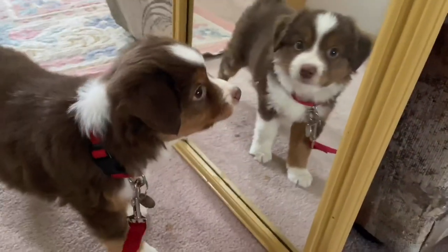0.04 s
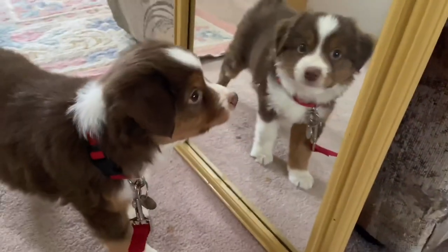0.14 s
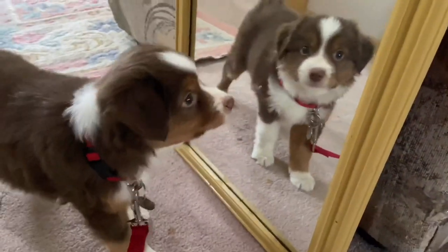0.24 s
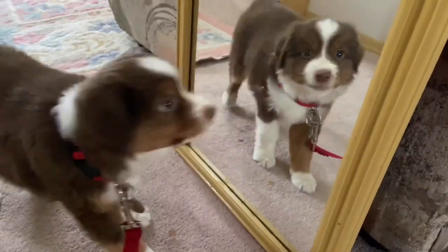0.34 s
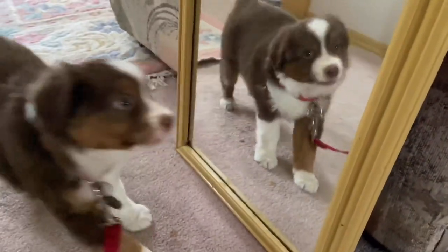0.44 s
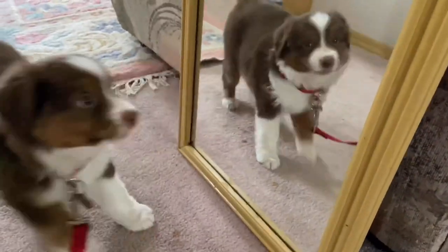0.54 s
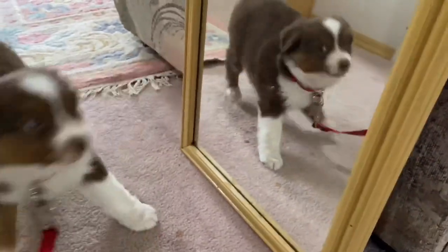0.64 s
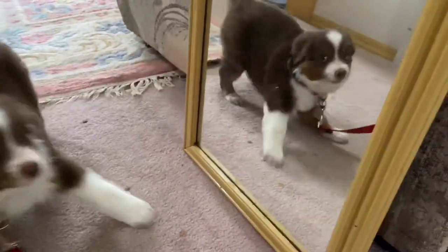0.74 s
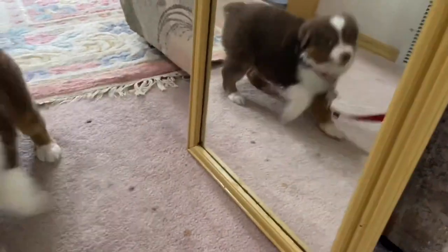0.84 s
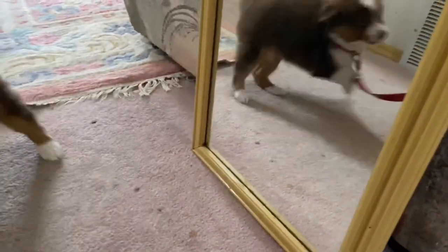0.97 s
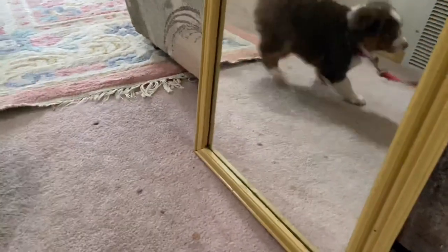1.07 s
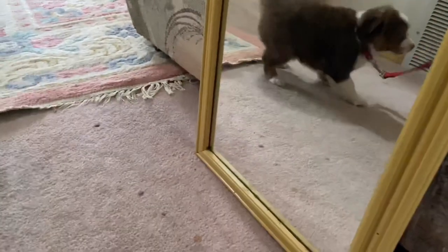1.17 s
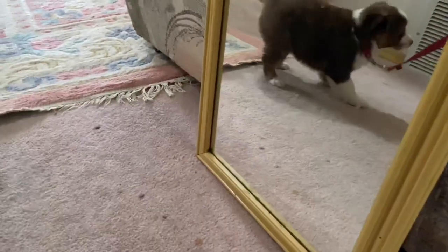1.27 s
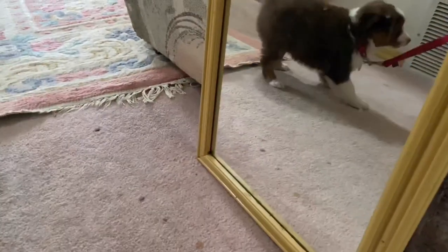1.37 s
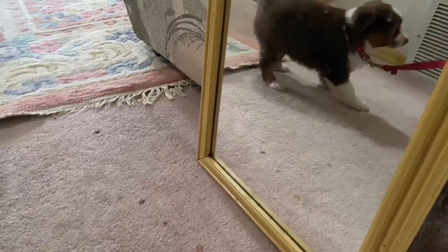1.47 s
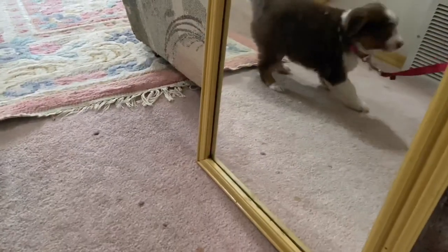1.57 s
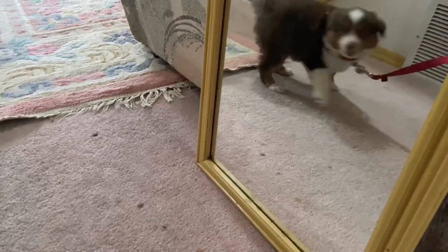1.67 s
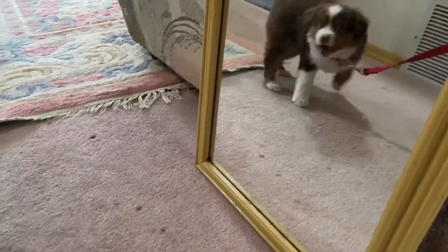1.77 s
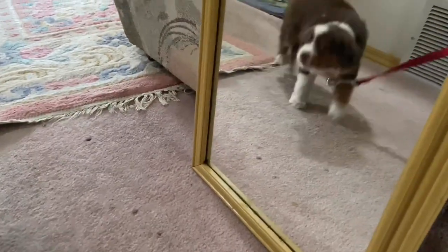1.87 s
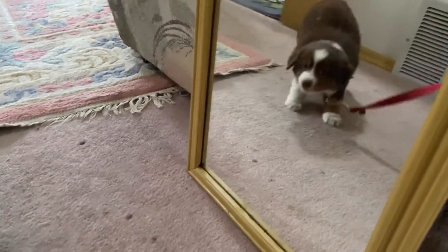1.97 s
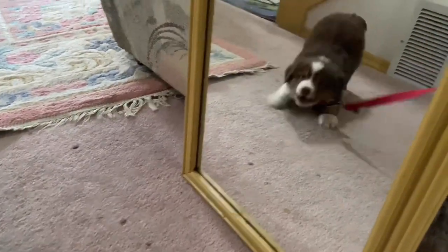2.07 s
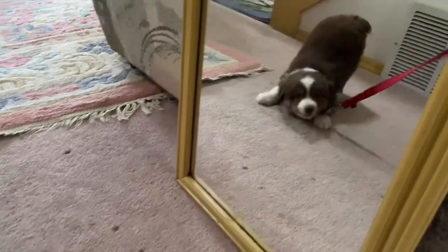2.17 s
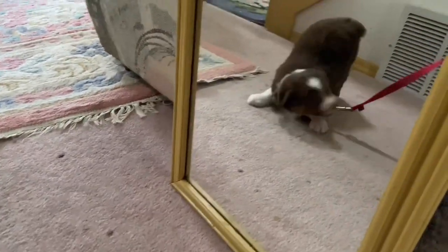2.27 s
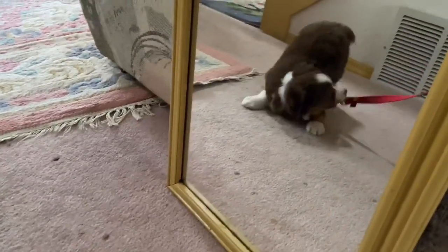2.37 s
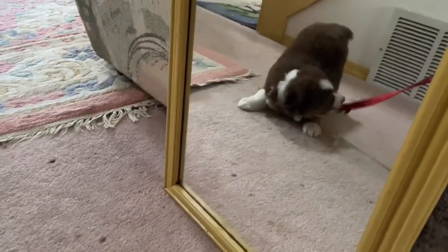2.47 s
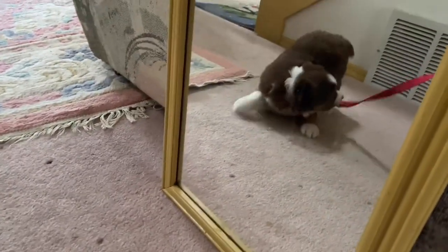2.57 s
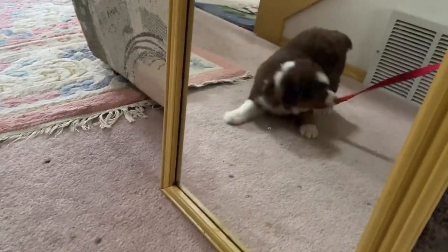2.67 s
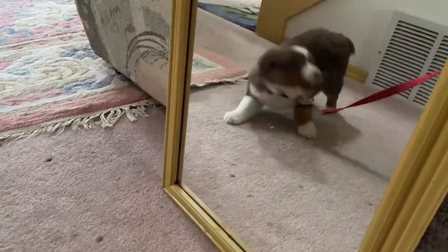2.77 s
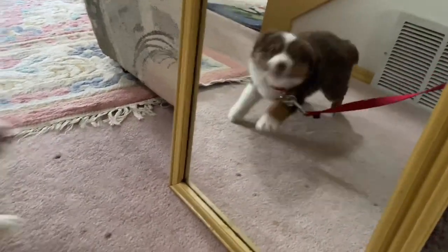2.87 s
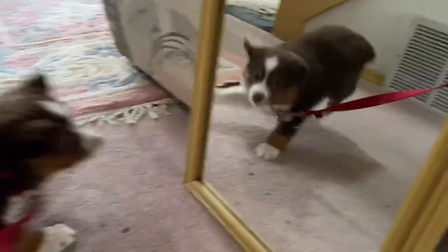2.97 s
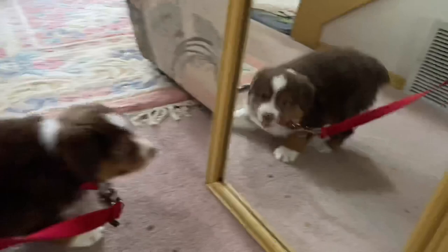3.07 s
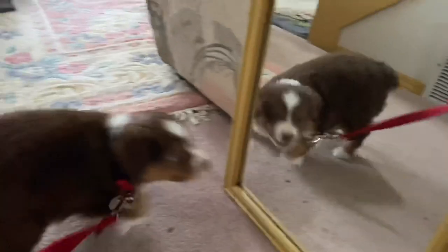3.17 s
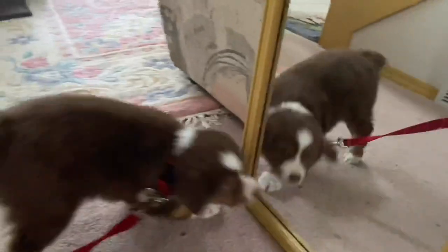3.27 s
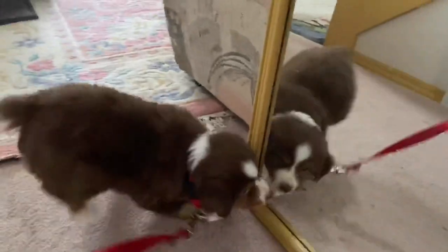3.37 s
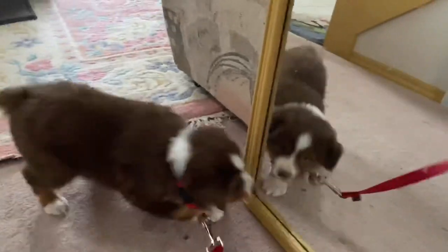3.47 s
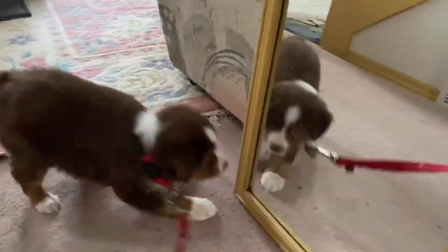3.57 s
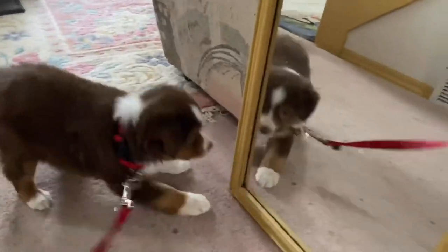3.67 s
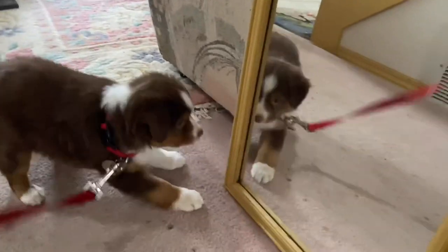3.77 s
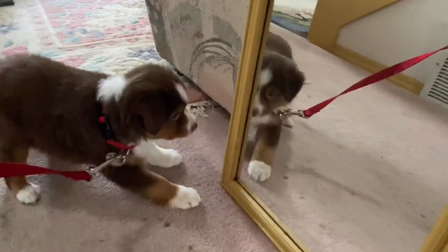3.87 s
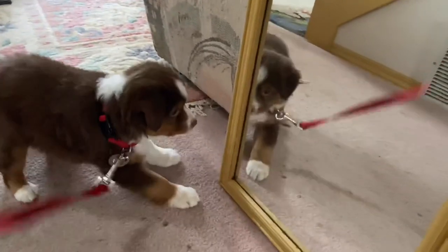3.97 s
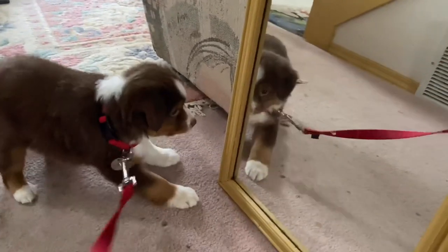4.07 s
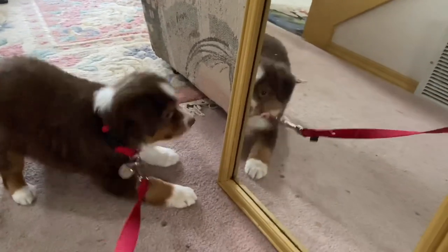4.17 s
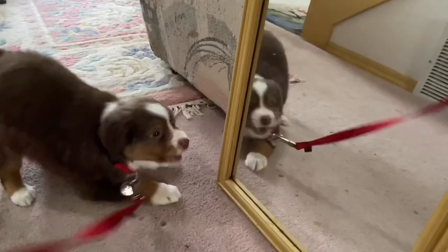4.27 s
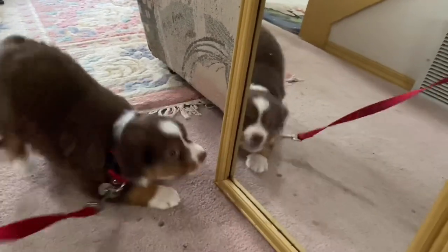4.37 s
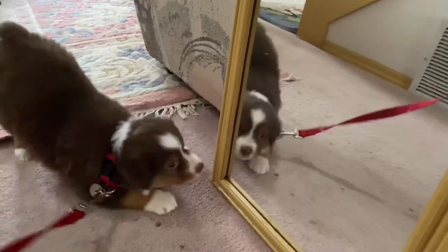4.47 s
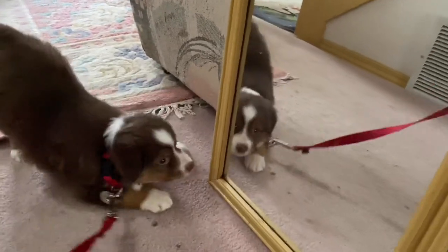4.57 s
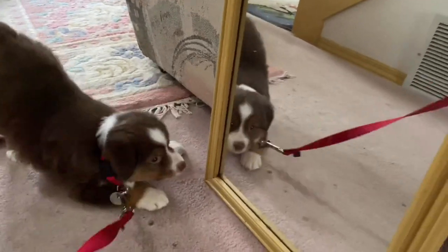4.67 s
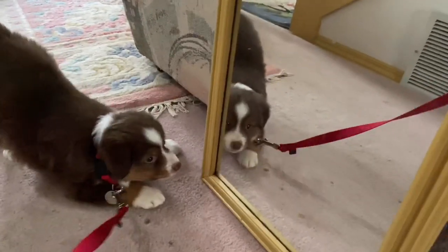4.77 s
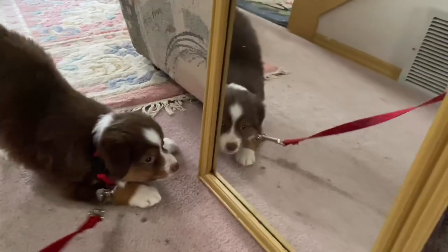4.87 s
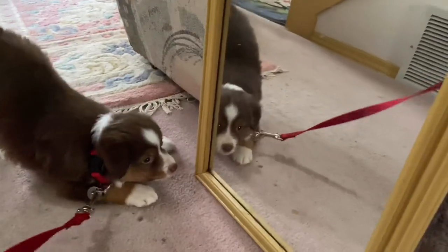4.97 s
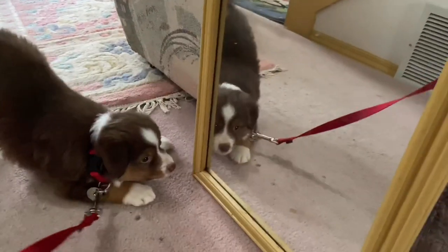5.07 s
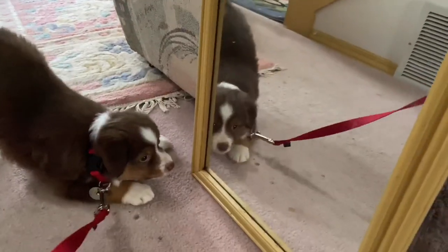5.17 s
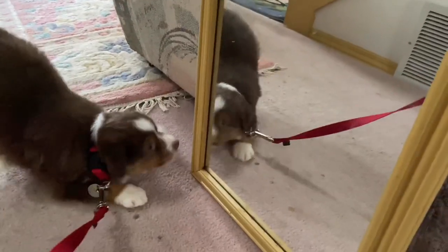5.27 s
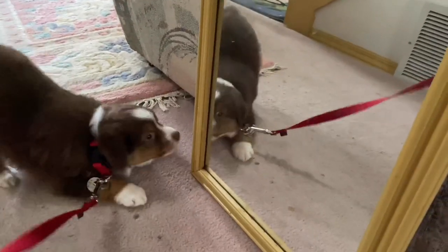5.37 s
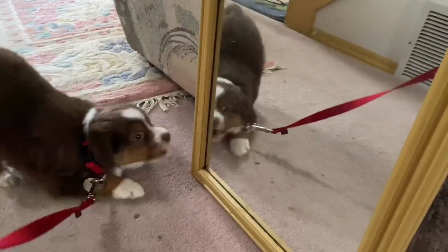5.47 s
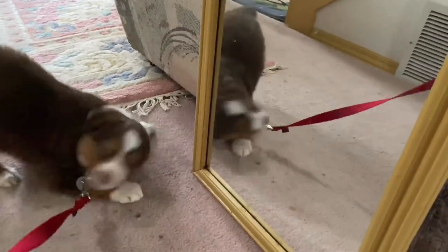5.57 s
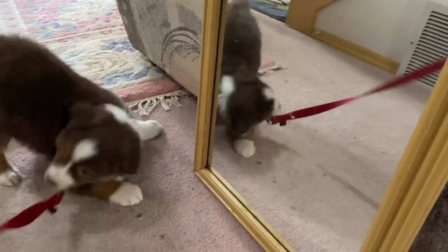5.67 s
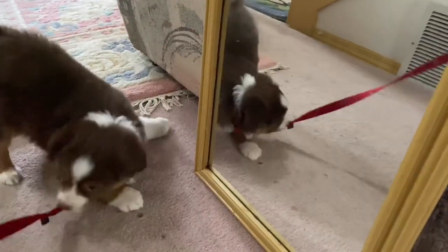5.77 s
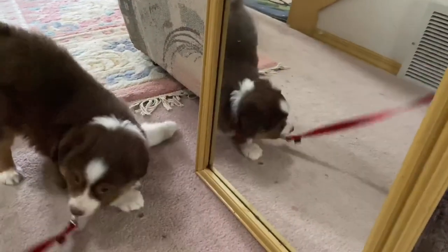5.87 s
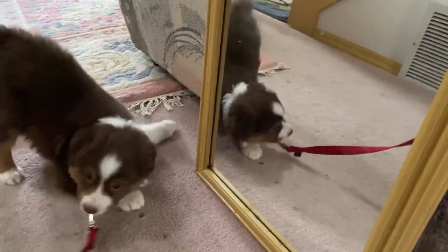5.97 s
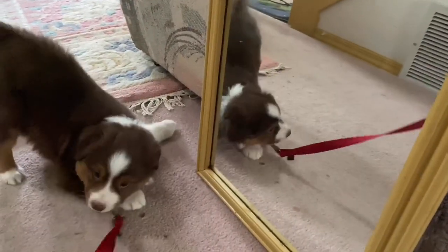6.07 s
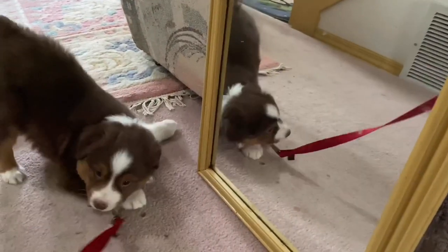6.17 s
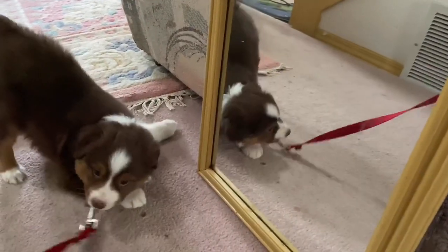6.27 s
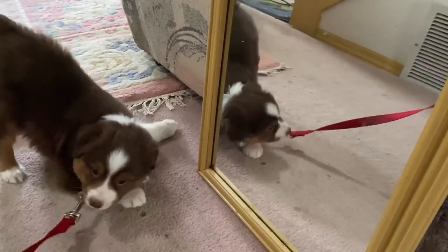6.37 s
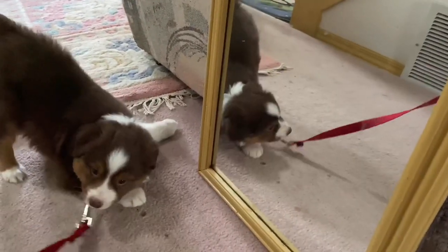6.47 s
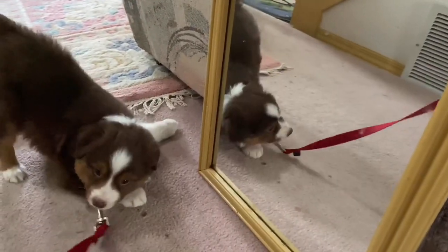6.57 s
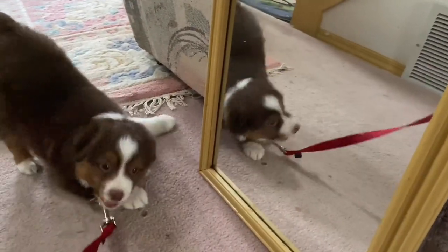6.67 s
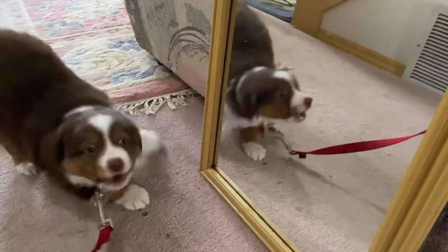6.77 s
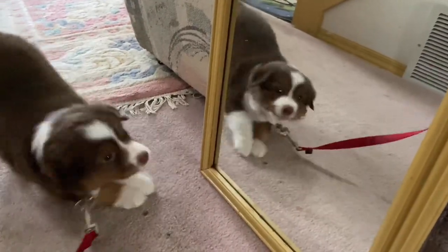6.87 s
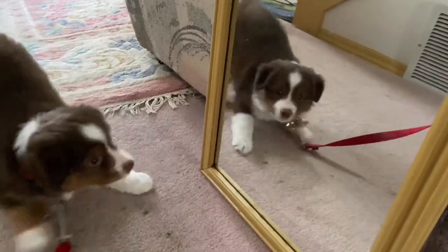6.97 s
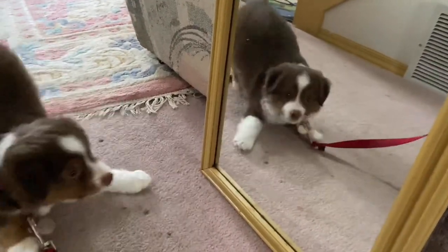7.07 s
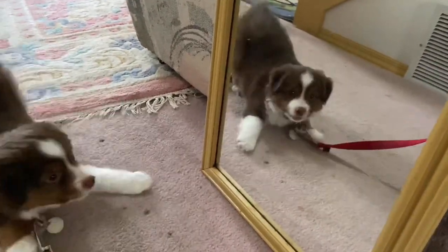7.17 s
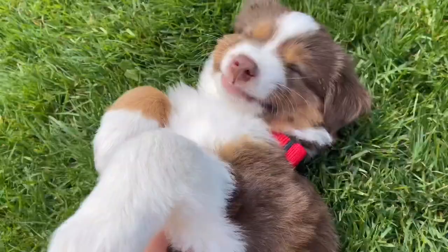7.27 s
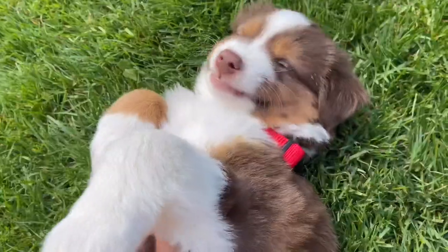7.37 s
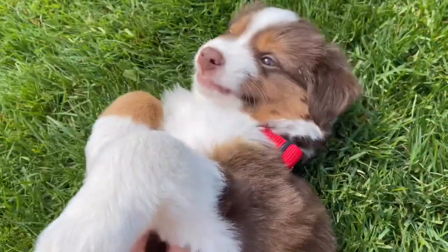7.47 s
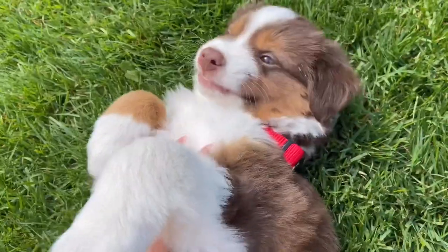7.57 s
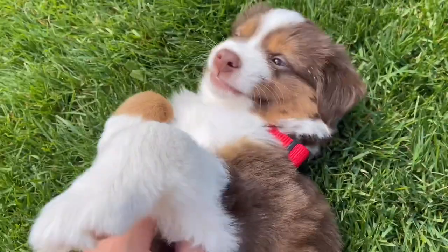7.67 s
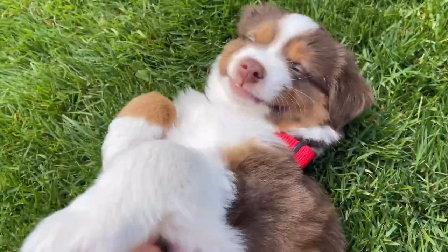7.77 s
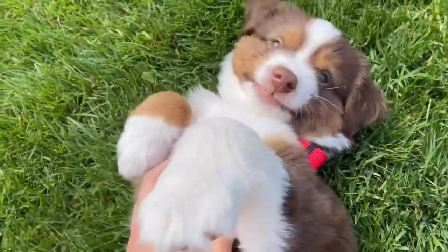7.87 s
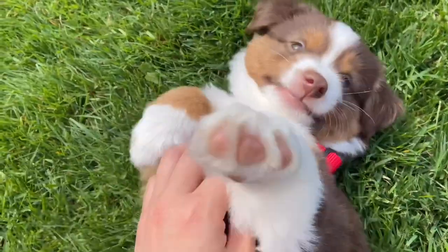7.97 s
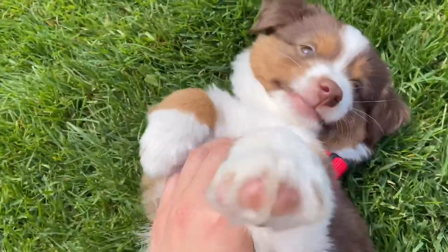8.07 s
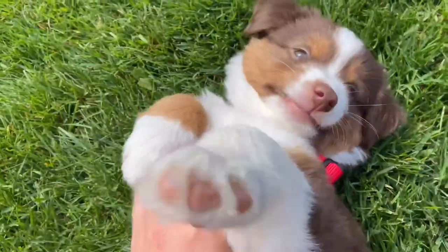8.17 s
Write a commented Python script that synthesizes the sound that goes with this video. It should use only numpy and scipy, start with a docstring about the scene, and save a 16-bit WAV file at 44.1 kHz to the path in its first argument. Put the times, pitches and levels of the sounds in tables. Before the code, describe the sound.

High-pitched puppy barks ring close by over a low room hum, with bright tag clinks and muffled paw thuds, before a brief quiet lawn ending.

```python
"""On a carpet indoors, close to a pair of microphones, a puppy barks in short arched yelps.
Its voice is a stack of harmonics shaped by throat and mouth, with rough air on top. Its collar tag clinks
on the leash clip as decaying tones plus clicks; after a short tick, paws scuff as grainy noise and thud as
damped low tones. The room hums as filtered noise and answers each bark with a decaying tail of echoes.
At the end the scene moves to a lawn: soft outdoor air, also filtered noise, and low puffs of wind."""
import sys
import numpy as np
from scipy import signal
from scipy.fft import rfft, irfft, next_fast_len
from scipy.io import wavfile
from scipy.ndimage import uniform_filter1d

SR = 44100
rng = np.random.default_rng(int(sys.argv[2]) if len(sys.argv) > 2 else 0)


def wav_record(signal):
    """Record a signal, one row per channel, as 16-bit PCM in the file named by sys.argv[1]."""
    frames = np.transpose(np.atleast_2d(signal))
    bounded = np.clip(frames, -1, 1)
    # unit amplitude maps onto the largest positive 16-bit level
    quanta = np.round(bounded * 32767).astype(np.int16)
    wavfile.write(sys.argv[1], SR, quanta)


N = 362274  # length in samples


def gain_of(db):
    """Turns decibels into a factor."""
    return 10 ** (np.asarray(db) / 20)


def evened(x):
    """Scales to an rms of 1."""
    return x / np.sqrt(np.mean(x ** 2) + 1e-20)


def smooth(x, *sizes):
    """Runs moving averages of the given lengths along the last axis, then scales to an rms of 1."""
    for size in sizes:
        x = uniform_filter1d(x, size=size)
    return evened(x)


def read(points, hz):
    """Reads a curve between its points on a log-frequency axis."""
    f, value = np.transpose(points)
    return np.interp(np.log(hz + 1), np.log(f + 1), value)


def follow(points, t):
    """Reads a curve of (seconds, value) points with straight lines between them."""
    return np.interp(t, *np.transpose(points))


def add(mix, s, sound):
    """Mixes a sound in at s seconds."""
    part = mix[..., round(s * SR):][..., :sound.shape[-1]]
    part += sound[..., :part.shape[-1]]


def coloured(x, points):
    """Filters x by a spectrum, then scales to an rms of 1."""
    size = x.shape[-1]
    gains = gain_of(read(points, np.fft.rfftfreq(size, 1 / SR)))
    return evened(irfft(rfft(x) * gains, size))


def bumps(rows, t60):
    """Low tones that start softly and lose 60 dB in t60 seconds."""
    out, t = np.zeros(N), np.arange(6000) / SR
    for s, db, hz in rows:
        onset = 1 - np.exp(-t / 0.0024)
        add(out, s, gain_of(db - 60 * t / t60) * onset * np.sin(2 * np.pi * hz * t))
    return out


def outside():
    """Share of outdoor air: 0 indoors, then a 45 ms fade to 1 on the lawn."""
    return np.clip((np.arange(N) / SR - 7.2) / 0.045, 0, 1)


# How alike the background noise is in the two channels. Each row: frequency in Hz, likeness (1 is identical).
LIKENESS = [(30, .99), (200, .94), (500, .6), (3000, .4)]


def air(points, patchy_db, size):
    """Stereo noise whose spectrum has drifting louder and softer patches."""
    hop = size // 4
    hz = np.fft.rfftfreq(size, 1 / SR)
    a, b, c, d, patches = rng.standard_normal((N // hop + 5, len(hz), 5)).T
    patches = uniform_filter1d(patches, size=6, axis=0)
    patches = evened(uniform_filter1d(patches, size=5, axis=1))
    same = np.clip(read(LIKENESS, hz), -1, 1)[:, None]
    left = a + 1j * b
    right = same * left + np.sqrt(1 - same ** 2) * (c + 1j * d)
    z = np.array([left, right]) * gain_of(read(points, hz)[:, None] + patchy_db * patches)
    return evened(signal.istft(z, nperseg=size, noverlap=size - hop)[1][:, :N])


# Colour of the room's hum. Each row: frequency in Hz, relative strength in dB per Hz.
HUM_COLOUR = [(15, -52.5), (25, -34), (69, 2), (128, -10.5), (262, -24), (293, -22), (405, -30),
              (1200, -45), (1560, -74), (2640, -120)]
# Loudness of the hum over time. Each row: time in seconds, level in dB.
HUM_LEVEL = [(0, -53), (1.66, -52.5), (1.75, -60), (4.5, -63), (6.5, -66.5), (7.3, -56)]
# Colour of the faint hiss. Each row: frequency in Hz, relative strength in dB per Hz.
HISS_COLOUR = [(300, -8.5), (1000, -2.5), (4000, -2), (10400, -8.5), (16000, -26.5)]
HISS_DB = -85.5


def room_hum():
    """Low filtered noise with faint hiss, fading out where the lawn begins."""
    hum = air(HUM_COLOUR, 0.42, size=4096) * gain_of(follow(HUM_LEVEL, np.arange(N) / SR))
    hum += gain_of(HISS_DB) * air(HISS_COLOUR, 3.5, size=512)
    return (1 - outside()) * hum


# Paws and fur rub the carpet; the first row is a short tick.
# Each row: start in seconds, swell in seconds, fade in seconds,
# peak level in dB and treble against it in dB (both before a fixed trim), band that stands out in Hz.
TICK_AND_SCUFFS = [(.25, .004, 0.052, -52.5, -34, 1000), (.4, .16, 0.13, -43.5, -4.5, 1035),
                   (0.931, 0.035, .11, -45.5, -4, 2540), (1.18, .08, .3, -68.5, -3, 845),
                   (1.47, .05, 0.35, -61, -14.5, 768), (2.92, .03, .2, -57.5, -20, 1670),
                   (4.08, 0.019, .08, -59.5, -37, 1500), (4.63, 0.037, 0.096, -67, -45, 1810),
                   (5.8, 0.085, 0.067, -63.5, -18, 860), (6.84, 0.061, 0.25, -56.5, 6, 2140)]
# Colour of the rubbed carpet. Each row: frequency in Hz, relative strength in dB per Hz.
CARPET_COLOUR = [(250, -17.5), (500, -5.5), (1000, 7.5), (3200, -5), (7000, -13), (9000, -57.5)]
# Colour of the treble in a rub. Each row: frequency in Hz, relative strength in dB per Hz.
FUR_COLOUR = [(6000, -35.5), (8000, -5.5), (11400, 1.4), (15500, -13.5), (16800, -30)]
STROKE_START_DB, STROKE_END_DB = -27, -25  # ends of a stroke against its peak


def tick_and_scuffs():
    """A short tick, then friction: grainy noise, uneven from band to band, swells and fades with each row."""
    out = np.zeros(N)
    for s, swell, fade, peak_db, treble_db, hz in TICK_AND_SCUFFS:
        t = np.arange(0, swell + fade, 1 / SR)
        db = peak_db + np.interp(t, [0, swell, swell + fade], [STROKE_START_DB, 0, STROKE_END_DB])
        # every grain of 60 samples has its own loudness
        grain_db = 3.0 * rng.exponential(1, 24000 // 60).repeat(60)
        grains = (rng.standard_normal((3, 24000)) * gain_of(grain_db))[:, :len(t)]
        bands = np.linspace(250, 9000, 30)
        weave_db = read(CARPET_COLOUR, bands) + 6.4 * rng.standard_normal(len(bands))
        body = coloured(grains[0], np.transpose([bands, weave_db]))
        treble = coloured(grains[1], FUR_COLOUR)
        band = coloured(grains[2], [(hz * .5, -30), (hz * .85, -3), (hz * 1.2, -3), (hz * 2, -30)])
        rub = body + 1.6 * band + gain_of(treble_db - 3.0) * treble
        add(out, s, gain_of(db - 2.0) * rub * signal.windows.tukey(len(t), .06))
    return out


# How long the echoes last. Each row: frequency in Hz, seconds to fall by 60 dB.
ROOM_DECAY = [(250, 0.86), (660, 0.32), (1740, 0.37), (3100, .38), (4590, 0.1), (12000, 0.84)]


def room(x):
    """Echoes as sparse taps of random sign, one in every 20 samples, each band dying at its own speed."""
    taps = np.zeros((2, SR))
    at = np.arange(300, SR - 20, 20) + rng.integers(0, 20, (2, (SR - 301) // 20))
    np.put_along_axis(taps, at, rng.choice([-1., 1.], at.shape), 1)
    taps[1] = .8 * taps[0] + .6 * taps[1]  # the two channels share part of their echoes
    hz, t, z = signal.stft(taps, SR, nperseg=256)
    decay = gain_of(-60 * t / read(ROOM_DECAY, hz)[:, None])
    tail = signal.istft(z * decay, SR, nperseg=256)[1]
    tail /= np.linalg.norm(tail, axis=1)[:, None]
    return signal.fftconvolve(x[None], tail, axes=1)[:, :N]


# Phase of the left port against the right. Each row: frequency in Hz, phase in radians.
PORT_PHASE = [(60, .1), (500, .7), (1150, 1.7), (1900, 1.1), (7500, .9), (8400, -2.6), (9600, -3.4),
              (10500, -5.8), (11600, -6.3), (12500, -9.1), (14000, -9.7), (14700, -12)]


def ports(x):
    """Sound in the room reaches the two microphone ports with a phase difference that depends on frequency."""
    size = next_fast_len(N)
    phase = read(PORT_PHASE, np.fft.rfftfreq(size, 1 / SR))
    turn = np.exp(.5j * np.outer([1, -1], phase))  # half on the left, the opposite half on the right
    return irfft(rfft(x, size) * turn, size)[:, :N]


# Paws land on the carpet. Each row: start in seconds, level in dB before the soft onset, pitch in Hz.
THUDS = [(0.458, -31, 70.8), (0.566, -25.5, 184), (0.62, -26.5, 90.7), (0.717, -37, 90.4), (1.087, -36, 86),
         (2.871, -37.5, 85.7), (3.006, -30.5, 81.8)]


def paw_thuds():
    """Each landing is a low tone that dies away quickly."""
    return bumps(THUDS, t60=.059)


# click against ring in dB before a fixed trim.
CLINKS = [(0.652, -44, 3), (0.6984, -36, 2.5), (0.7088, -12.5, -12), (0.8003, -33.5, 1.5),
          (0.8757, -41, 6.5), (0.957, -31, -4), (1.0653, -22.5, -7.5), (1.0945, -35, -0.5),
          (1.1538, -40.5, 0), (1.5057, -41, -6), (1.5539, -45, -7.5), (1.5832, -25, -6), (1.6788, -39.5, 7),
          (2.1779, -47.5, 5), (2.2503, -46.5, 2.5), (2.2878, -39, -7), (2.3805, -43, -7),
          (2.8384, -42.5, -1), (3.024, -46, -0.5), (3.7655, -49, 4), (4.1726, -47.5, -8.5),
          (5.7869, -40.5, -9.5), (6.8907, -42.5, -28), (6.981, -45, 1.5), (7.0224, -33.5, -4.5),
          (7.1014, -52.5, 4.5), (7.1202, -41, -3), (7.187, -52, -7)]
# Tones the tag rings with. Each row: frequency in Hz, relative level in dB, seconds to fall by 60 dB.
TAG_TONES = [(6600, -41.5, 0.12), (7730, -29, .15), (10270, -6.5, 0.035), (10410, 1.5, 0.089),
             (10600, -24, 0.18), (13800, -23.5, .2), (15300, -29.5, .08)]
# Colour of the click. Each row: frequency in Hz, relative strength in dB.
CLICK_COLOUR = [(500, -11), (2000, -6.5), (7000, -0.5), (11000, 4.5), (15000, 0.5), (16800, -10.5)]


def tag():
    """Struck metal: each clink is a short wide burst of noise plus the decaying tones of the tag."""
    out, t = np.zeros(N), np.arange(12000) / SR
    for s, db, click_db in CLINKS:
        ring = np.zeros(len(t))
        for hz, tone_db, t60 in TAG_TONES:
            hit_db = tone_db + 1.8 * rng.standard_normal()  # every hit excites the tones differently
            ring += gain_of(hit_db - 60 * t / t60) * np.sin(2 * np.pi * hz * t)
        add(out, s, gain_of(db - 4.0) * ring * (1 - np.exp(-t / 0.0012)))
        click = coloured(rng.standard_normal(1200), CLICK_COLOUR)
        fade_db = -60 * t[:1200] / 0.021
        add(out, s, gain_of(db + click_db - 2 + fade_db) * click)
    return out


RISE_POWER, FALL_POWER = 3.2, 2.5  # a higher power is a flatter top


def arch(t, crest, rise, fall):
    """Tension of the vocal folds: a flat-topped arch from 0 to 1 and back."""
    up = np.exp(-abs((t - crest) / rise) ** RISE_POWER)
    down = np.exp(-abs((t - crest) / fall) ** FALL_POWER)
    return np.where(t < crest, up, down)


# Gain of throat and mouth on the harmonics. Each row: frequency in Hz (for throat factor 1), gain in dB.
THROAT = [(150, -24.5), (330, -6), (700, -13), (930, -2.5), (1100, 7), (1290, -3), (1600, -9.5), (2050, -8),
          (2450, -12.5), (2850, -15.5), (3400, -19), (4300, -27.5), (5500, -49.5), (9000, -61)]
MOUTH_WIDTH_HZ, MOUTH_CLOSED = 110, .45  # after the crest this share of the mouth's dB gain is left
UPPER_WIDTH_HZ, UPPER_DB = 73, 9  # upper mouth resonance


def vocal_folds(row, t, hz, turns, hoarse_db, bright_db):
    """Ten harmonics of the pitch through throat and mouth, breaking up as the voice turns hoarse."""
    crest, throat, upper_db, mouth_hz, mouth_db, upper_hz = row[1], *row[9:]
    k = np.arange(1, 11)[:, None]
    a, b, flutter = rng.standard_normal((3, len(k), 16000))[..., :len(t)]
    flutter = smooth(flutter, 500, 300)
    gains = gain_of(read(THROAT, k * hz / throat) + bright_db * np.log2(k * hz / 1100))
    gains[3:] *= gain_of(upper_db)
    gains *= gain_of(1.4 * (k - .5) ** .6 * flutter)
    # uneven cycles smear each harmonic into a narrow band of noise, the upper ones first
    broken = np.clip(gain_of(hoarse_db) * .4 * (k - .6) ** 1.5, 0, 1)
    a, b = smooth(a, 170, 110), smooth(b, 170, 110)
    shimmer = np.sqrt(1 - broken ** 2) + broken * (a + 1j * b) / np.sqrt(2)
    opening = np.where(t < crest, 1, MOUTH_CLOSED)
    ring_db = mouth_db * opening * np.exp(-((k * hz - mouth_hz) / MOUTH_WIDTH_HZ) ** 2)
    ring_db += UPPER_DB * np.exp(-((k * hz - upper_hz) / UPPER_WIDTH_HZ) ** 2)
    gains *= gain_of(ring_db)
    waves = gains * shimmer * np.exp(2j * np.pi * k * turns + .3j * k ** 2)
    return waves.real.sum(0) / np.sqrt((gains ** 2).sum(0) / 2)


# Colour of the air rushing through the hoarse folds.
# Each row: frequency in Hz (for throat factor 1), relative strength in dB per Hz.
RASP_COLOUR = [(150, -32), (500, -21), (700, -11.5), (1050, -1.5), (1500, -8.5), (2000, -15.5), (2450, -18),
               (3100, -17), (4500, -28.5), (6000, -34.5), (8500, -38.5), (11500, -29.5), (15500, -31),
               (16800, -68.5)]
RASP_UPPER_DB, RASP_UPPER_WIDTH_HZ = 7, 370  # upper mouth resonance on the air


def rasp(row, t, turns, bright_db):
    """Rushing air: noise in uneven lumps that also pulses once per cycle of the folds."""
    throat, upper_hz = row[9], row[13]
    lumps, noise = rng.standard_normal((2, 16000))[:, :len(t)]
    lumps = gain_of(2.9 * smooth(lumps, 300))
    pulses = .5 + np.exp(-(turns % 1) / 0.2)
    rush = coloured(pulses * lumps * noise, [(f * throat, db) for f, db in RASP_COLOUR])
    below, above = upper_hz - RASP_UPPER_WIDTH_HZ, upper_hz + RASP_UPPER_WIDTH_HZ
    rush = coloured(rush, [(below, 0), (upper_hz, RASP_UPPER_DB), (above, 0)])
    low = signal.sosfiltfilt(signal.butter(2, 1800, fs=SR, output="sos"), rush)
    return low + gain_of(0.65 * bright_db) * (rush - low)


# The voice catches and rings the throat once. Each row: start in seconds, level in dB, pitch in Hz.
CATCHES = [(2.003, -13, 1087), (2.023, -12, 1022), (3.176, -2.5, 939.3), (3.193, -5, 897.5),
           (4.262, -3, 1051), (4.269, -.5, 1041), (4.286, -5, 988.4), (5.439, -6, 1178), (5.451, -9, 1288),
           (5.465, -3, 1024), (5.479, -6.5, 947)]
CATCH_S = .011  # how far a catch reaches to either side


def catch_nearness(t):
    """How close each moment is to a catch in the voice: 1 right at it, 0 far away."""
    return np.max([np.exp(-((t - at) / CATCH_S) ** 2) for at, *_ in CATCHES], axis=0)


def throat_rings():
    """Each catch sounds as one brief tone that swells and dies, slightly to the left."""
    out, t = np.zeros((2, N)), np.arange(2000) / SR
    for s, db, hz in CATCHES:
        swell = (t / .003) ** 2 * np.exp(2 - 2 * t / 0.0032)
        add(out, s, gain_of(db) * swell * np.sin(2 * np.pi * hz * t) * gain_of([[1.2], [-1.2]]))
    return out


LOW_HZ = 227.4  # the pitch arch stands on this
SLACK_WOBBLE = .07  # slack folds hold the pitch badly: typical share of the pitch at the feet of the arch
SLACK_HOARSE_DB, SLACK_DULL_DB = -5.5, -12  # hoarseness, and brightness per octave lost, at the feet
DULLING_DB_PER_S, OPEN_S = 47, .05  # the mouth closes from OPEN_S before the crest: dB per octave lost a second
BURST_HOARSE_DB, BURST_BRIGHT_DB, BURST_S = 3.5, 8, 0.066  # a bark out of silence opens with a bright rush
CATCH_HOARSE_DB, CAUGHT_DB = -1.5, -6  # hoarseness at a catch, and how far the steady voice sinks there
DIRECT_DB = 1.17  # level of the direct voice against its effort
ATTACK_S, RELEASE_S, JOIN_S = 0.018, 0.058, 0.0086  # onset, ending, ending if the next bark has already begun


def bark(row, effort, last_end, next_start):
    """Folds tighten and slacken, so pitch arches up and down; slack folds are hoarser and duller."""
    s, crest, end, top_hz, rise, fall, clear_db, crest_db, pan_db = row[:9]
    t = np.arange(s, end, 1 / SR)
    tension = arch(t, crest, rise, fall)
    slack = (1 - tension) ** 2
    wobble = smooth(rng.standard_normal(16000), 400)[:len(t)]
    hz = (LOW_HZ + (top_hz - LOW_HZ) * tension) * (1 + SLACK_WOBBLE * slack * wobble)
    turns = np.cumsum(hz) / SR
    burst = np.exp(-(t - s) / BURST_S) * (s > last_end)
    caught = catch_nearness(t)
    hoarse_db = SLACK_HOARSE_DB + (clear_db - SLACK_HOARSE_DB) * tension
    hoarse_db += BURST_HOARSE_DB * burst * tension
    hoarse_db += caught * (CATCH_HOARSE_DB - hoarse_db)
    bright_db = crest_db - DULLING_DB_PER_S * np.maximum(t - crest, -OPEN_S)
    bright_db += SLACK_DULL_DB * slack + BURST_BRIGHT_DB * burst
    voice = vocal_folds(row, t, hz, turns, hoarse_db, bright_db)
    voice += gain_of(hoarse_db - 2.5) * rasp(row, t, turns, bright_db)
    effort_db = DIRECT_DB + uniform_filter1d(follow(effort, t), size=200, mode="nearest")
    ending_s = JOIN_S if end > next_start else RELEASE_S
    fades = np.clip((t - s) / ATTACK_S, 0, 1) ** 2 * np.clip((end - t) / ending_s, 0, 1)
    voice *= gain_of(effort_db + CAUGHT_DB * caught) * fades
    return s, voice * gain_of([[pan_db / 2], [-pan_db / 2]])


# The barks. Each row: start, crest and end in seconds, top pitch in Hz, rise and fall in seconds,
# hoarseness at the crest in dB before a fixed trim, brightness at the crest in dB per octave,
# left against right in dB, factor on the throat resonances, harmonics above the third in dB,
# mouth resonance in Hz, its gain in dB, upper mouth resonance in Hz.
BARKS = [ (1.689, 1.792, 1.94, 725.8, 0.096, .070, -17.5, 2.5, 3.5, 1.073, -10, 1230, 7.5, 3520),
         (1.928, 2.047, 2.17, 697.2, .082, .078, -8.5, 0, 2.5, 0.93, -5, 1100, 0.5, 2780),
         (2.422, 2.515, 2.64, 717, 0.074, .060, -9.5, 2.5, 0.5, 1, -1, 1210, 6, 3620),
         (2.627, 2.757, 2.86, 667.3, .108, .060, -9.5, 6, 2, 0.91, -4.5, 1220, 4, 3230),
         (3.131, 3.205, 3.32, 688.3, .057, .078, -4, -5, 0.5, 0.89, -11.5, 923, 13, 2950),
         (4.213, 4.302, 4.41, 697.5, .073, .070, -8.5, -1, 1, 0.97, -10.5, 1065, 8, 3240),
         (5.14, 5.244, 5.368, 690.2, .086, .068, -16.5, -0.5, 2, .99, -17.5, 1097, 12, 2770),
         (5.358, 5.476, 5.61, 655.3, .082, .080, -11, 2.5, 1.5, 0.92, -8.5, 1023, 8, 2830),
         (6.642, 6.737, 6.86, 702.5, .088, .066, -10.5, 2, 2, 1.036, -12.5, 1190, -7.5, 3294), ]
# How hard each bark is pushed: one list per bark. Each row: time in seconds, effort in dB.
EFFORT = [
    [(1.693, -41), (1.709, -15), (1.735, -11.5), (1.755, -23.5), (1.769, -18.5), (1.893, -49.5),
     (1.94, -42.5)],
    [(1.928, -42.5), (1.952, -39.5), (1.972, -25.5), (2.03, -16), (2.072, -24), (2.17, -42.5)],
    [(2.424, -48.5), (2.438, -30.5), (2.454, -22.5), (2.488, -19.5), (2.504, -25.5), (2.558, -16.5),
     (2.584, -36), (2.64, -37)],
    [(2.628, -42), (2.68, -23), (2.69, -29.5), (2.714, -15), (2.728, -18.5), (2.788, -28), (2.846, -49.5),
     (2.86, -50.5)],
    [(3.135, -41), (3.153, -18), (3.189, -17), (3.195, -11.5), (3.203, -18), (3.255, -19.5), (3.281, -36),
     (3.32, -45)],
    [(4.215, -52.5), (4.227, -27), (4.243, -14.5), (4.273, -10.5), (4.279, -15.5), (4.289, -11),
     (4.305, -23.5), (4.339, -24), (4.41, -46)],
    [(5.142, -41), (5.15, -32.5), (5.18, -11), (5.188, -9), (5.198, -16), (5.306, -32.5), (5.368, -37.5)],
    [(5.356, -38.5), (5.392, -35.5), (5.41, -18.5), (5.462, -15.5), (5.466, -10), (5.512, -21.5),
     (5.536, -23), (5.61, -45.5)],
    [(6.645, -30), (6.653, -29.5), (6.667, -18), (6.683, -16), (6.759, -24.5), (6.773, -28.5), (6.833, -43),
     (6.86, -34)],
]


def puppy():
    """All barks, and the catches that ring the throat."""
    out = throat_rings()
    starts, ends = [row[0] for row in BARKS], [row[2] for row in BARKS]
    for call in zip(BARKS, EFFORT, [0] + ends, starts[1:] + [np.inf]):
        add(out, *bark(*call))
    return out


# Colour of the air over the lawn. Each row: frequency in Hz, relative strength in dB per Hz.
LAWN_COLOUR = [(12, -47), (20, -23), (80, 0.5), (589, -25.5), (826, -23.5), (2150, -39), (5160, -38),
               (6840, -45), (8570, -46), (11400, -36), (15500, -59), (16800, -66)]
# Loudness of that air over time. Each row: time in seconds, level in dB.
LAWN_LEVEL = [(7.2, -61), (7.646, -59.5), (7.9, -53.5), (8.21, -55.5)]


def lawn_air():
    """Soft filtered noise that fades in as the hum of the room goes."""
    lawn = air(LAWN_COLOUR, 1.1, size=1024) * gain_of(follow(LAWN_LEVEL, np.arange(N) / SR))
    return outside() * lawn


# Wind bumps the microphone outdoors. Each row: start in seconds, level in dB before the soft onset, pitch in Hz.
PUFFS = [(7.279, -37.5, 66.76), (7.899, -36, 80.6), (7.958, -34.5, 127.7), (8.017, -29.5, 98.4),
         (8.109, -39, 63), (8.189, -31, 106.7)]


def wind_puffs():
    """Each puff pushes the microphone into a low, quickly damped tone."""
    return bumps(PUFFS, t60=0.074)


def scene():
    """Voice, tag, tick and carpet with their echoes in the room, over the background."""
    voice = puppy()
    small = tick_and_scuffs() + paw_thuds() + tag()
    echoes = gain_of([[-13], [-15.5]]) * room(voice.mean(0)) + gain_of(-10) * room(small)
    return ports(voice + echoes + small) + room_hum() + lawn_air() + wind_puffs()


EDGE_HZ = 16900  # the recorder passes nothing much above this


def record(dry):
    """The loudest peaks are rounded off; then the band limit of the recorder."""
    soft = dry / (1 + abs(dry / .98) ** 4) ** .25
    lowpass = signal.firwin(1023, EDGE_HZ, window=("kaiser", 11), fs=SR)
    return signal.oaconvolve(soft, lowpass[None], "same")


dry = scene()
out = record(dry)
wav_record(out)
```